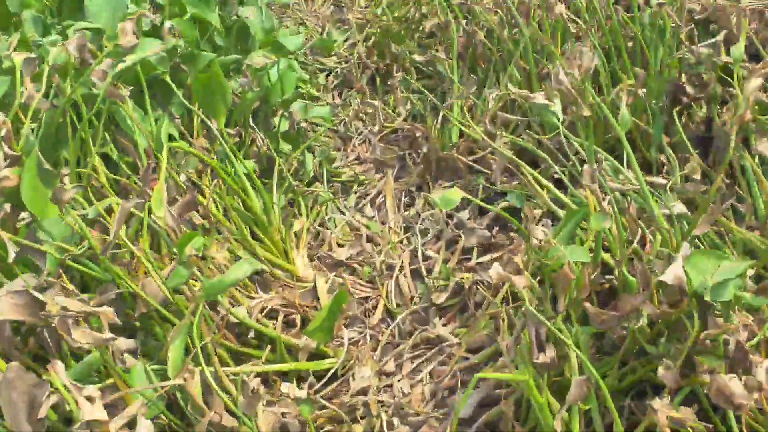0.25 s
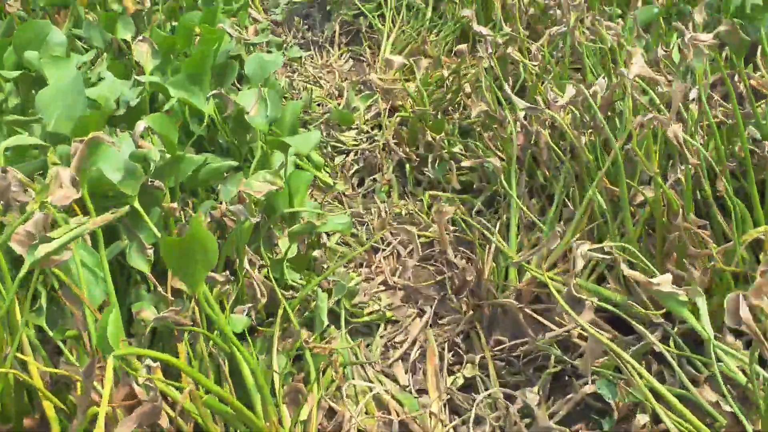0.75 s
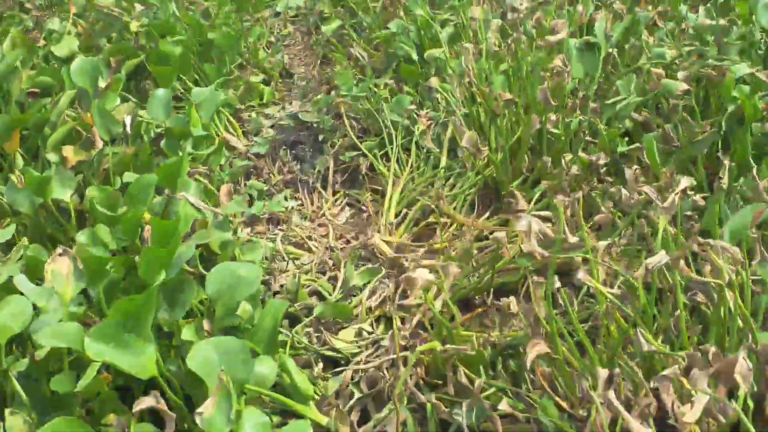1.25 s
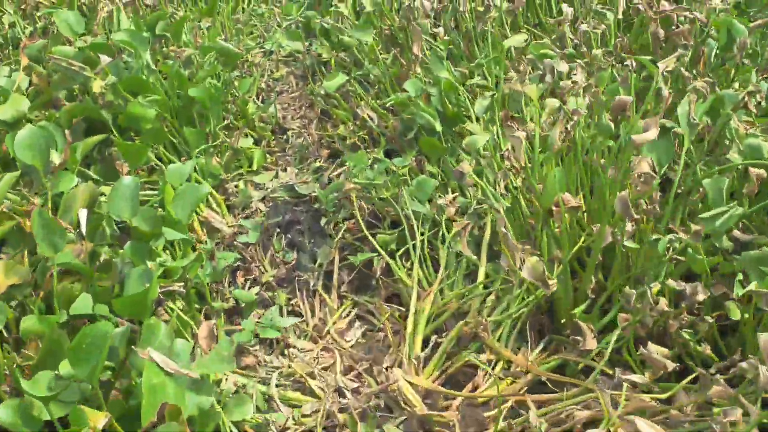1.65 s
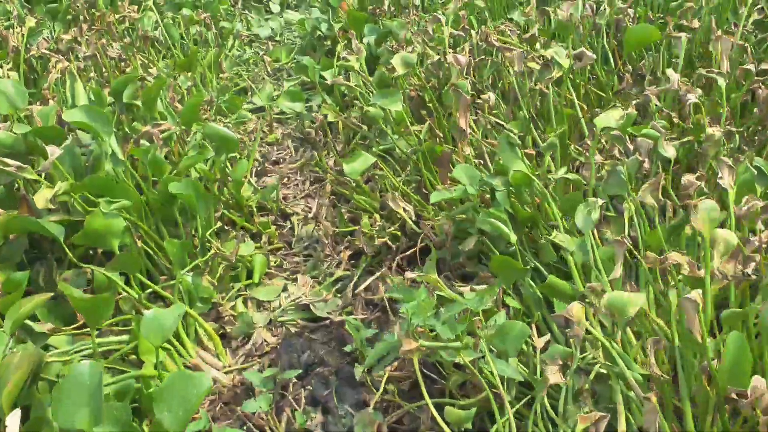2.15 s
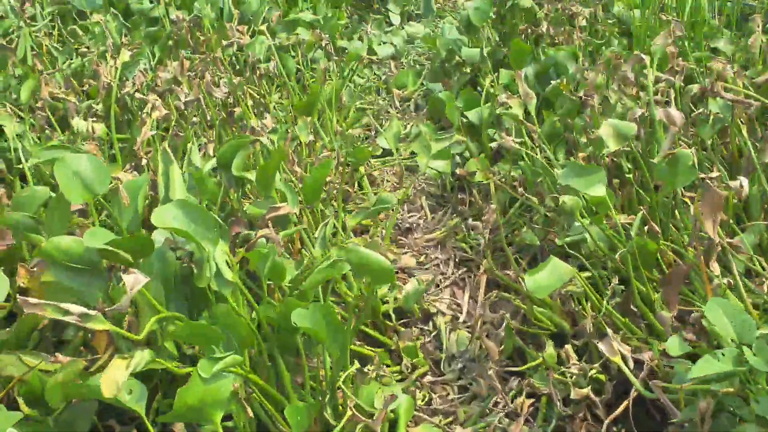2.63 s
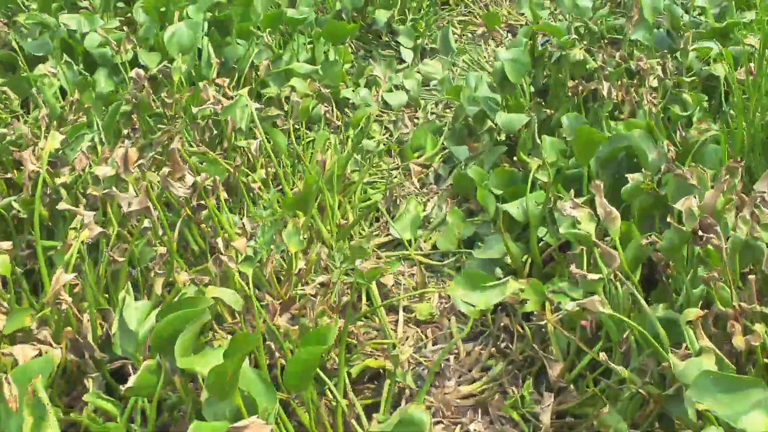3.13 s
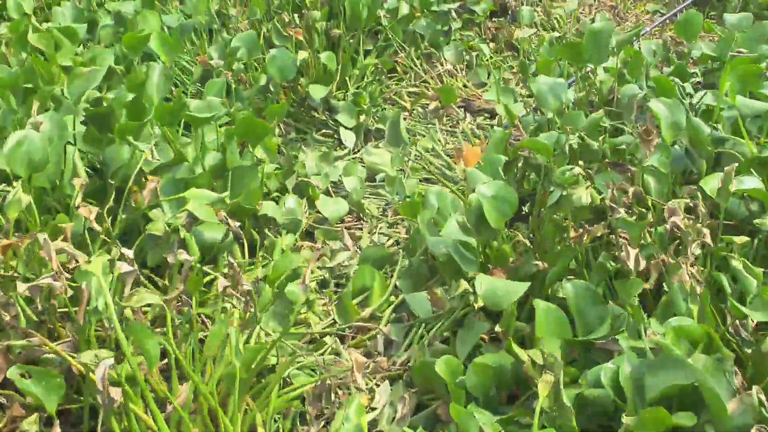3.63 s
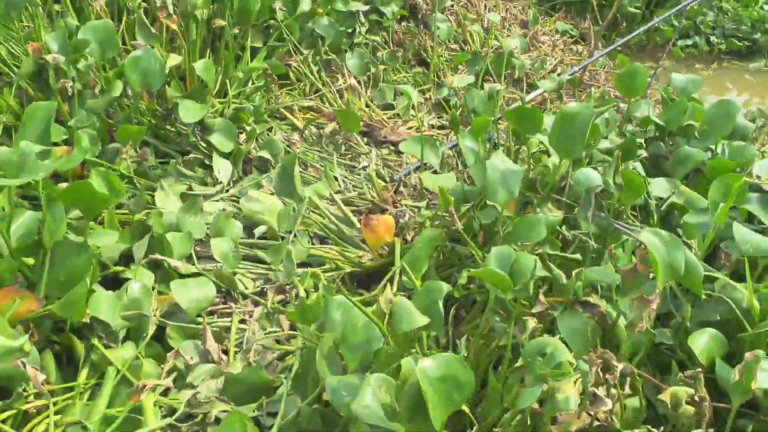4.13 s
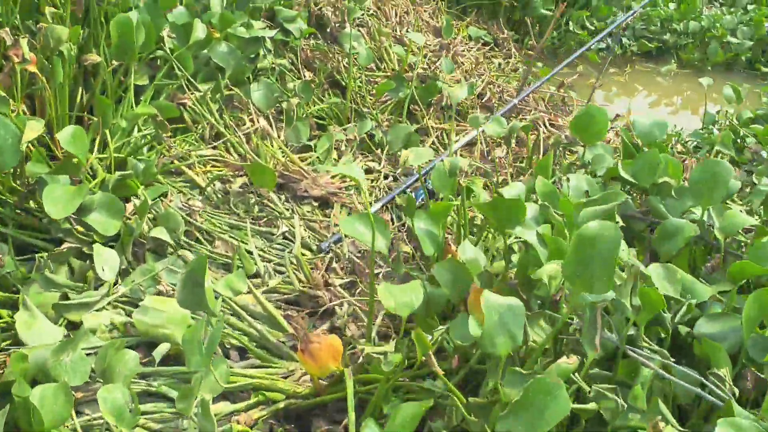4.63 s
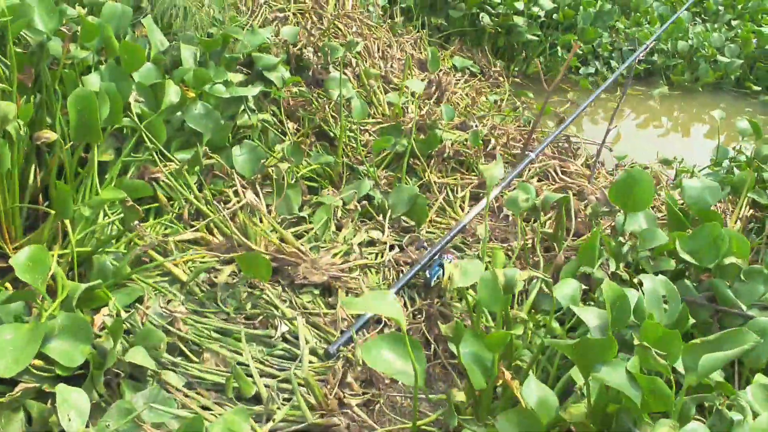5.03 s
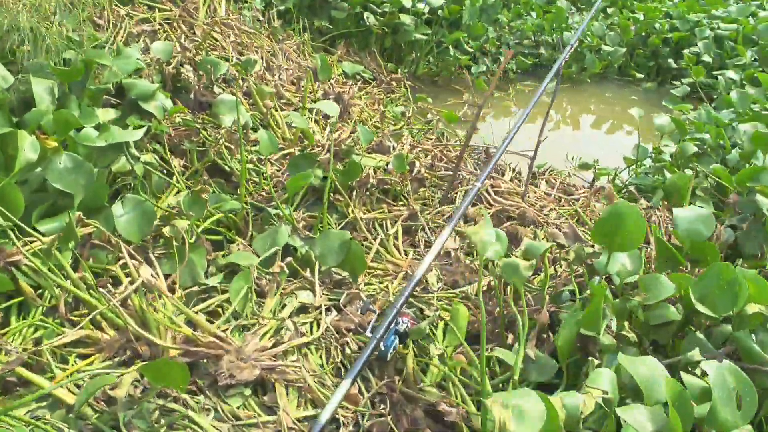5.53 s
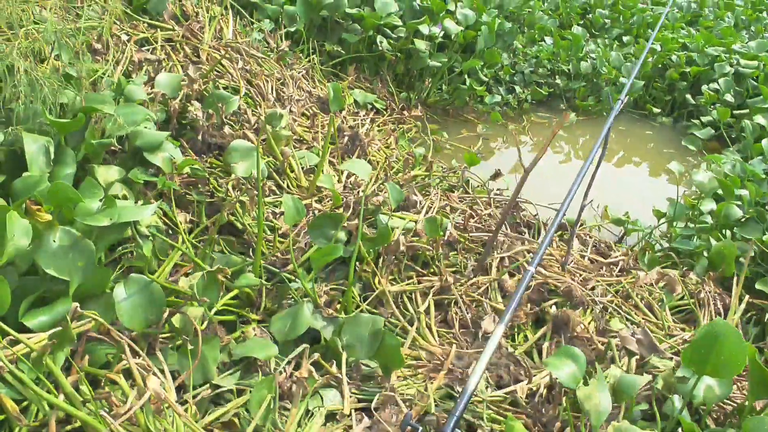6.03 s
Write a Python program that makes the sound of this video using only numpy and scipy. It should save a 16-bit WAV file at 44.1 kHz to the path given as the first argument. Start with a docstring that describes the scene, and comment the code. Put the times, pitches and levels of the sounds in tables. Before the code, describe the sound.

Close, uneven crackling of dry plants underfoot, sharp stem snaps and leaf ticks, over rumbling wind and creaky handling that ends in a hard knock.

```python
"""Footsteps press through dry grass and matted stems, close under a small stereo recorder held in the hand.
Each press shapes a dense scatter of clicks, coloured as stem crunch and leaf hiss; snaps ring at their own pitch.
Wind is shaped noise that buffets each microphone port on its own; jolts of the arm swing both ports alike.
The hand creaks and knocks on the hollow case, ringing its modes; grass further off stirs faintly behind.
"""
import sys
import numpy as np
from scipy import signal
from scipy.fft import rfft, irfft
from scipy.io import wavfile
from scipy.ndimage import uniform_filter1d

SR = 44100
rng = np.random.default_rng(int(sys.argv[2]) if len(sys.argv) > 2 else 0)


def generate_wav(signal):
    """Clip the signal to [-1, 1] and save it as 16-bit WAV at the path in sys.argv[1]."""
    frames = np.transpose(np.atleast_2d(signal))
    scaled = np.clip(frames, -1, 1) * 32767
    pcm = np.round(scaled).astype(np.int16)
    wavfile.write(sys.argv[1], SR, pcm)


N = 276948

# Foot pressing into the grass:
# (time [s], hold [s], stem level [dB], fade [dB/s], papery leaves against stems [dB])
FOOT_PRESSES = [(0.0, 0.058, -39, 250, 1), (0.127, 0.038, -54, 73, -0.4), (0.427, 0.035, -42.5, 250, -2),
                (0.447, 0.14, -39, 400, 0.6), (0.627, 0.019, -47.5, 66, -0.5),
                (0.827, 0.0037, -53.5, 295.5, -4), (1.067, 0.0056, -50.5, 302, -6.5),
                (1.133, 0.1, -52, 200, -2), (1.211, 0.064, -45.5, 109, -2.2), (1.5, 0.032, -64, 36, -5),
                (1.696, 0.087, -53.5, 200, -1), (1.799, 0.078, -43, 85, -3.5), (2.04, 0.015, -53, 302, -8),
                (2.286, 0.12, -46.5, 193, -2.5), (2.419, 0.046, -44, 79, -6.5),
                (2.833, 0.061, -48.5, 100, -0.5), (2.891, 0.04, -48, 196, -7),
                (2.957, 0.026, -45.5, 113, 0.5), (3.412, 0.094, -45.5, 73, -2.5),
                (3.718, 0.015, -55.5, 150, -8), (3.785, 0.15, -60, 80, -7), (3.951, 0.15, -44, 194, 0),
                (4.164, 0.15, -53, 250, -1), (4.455, 0.041, -57.5, 98, 0), (4.562, 0.16, -52.5, 100, -2),
                (4.731, 0.012, -45.5, 77, -5), (4.988, 0.023, -55.5, 150, -6),
                (5.05, 0.0093, -60, 250, -1.5), (5.116, 0.022, -53, 250, 1), (5.181, 0.026, -55, 150, -1),
                (5.289, 0.026, -51, 103, -3), (5.404, 0.027, -47.5, 70, -2), (5.567, 0.11, -54.5, 150, -2),
                (5.751, 0.043, -51.5, 200, -6.5), (5.91, 0.013, -59, 195, 3), (6.031, 0.15, -49.5, 200, -3),
                (6.14, 0.018, -45.5, 113, -1.5)]
# Colour of the crunching stems: (frequency [Hz], relative density [dB])
STEM_COLOUR = [(150, -30.5), (400, -11), (900, -15), (1700, -11.5), (3300, -11.5), (5000, -14),
               (7000, -23.5), (9000, -54)]
# Colour of the hissing dry leaves: (frequency [Hz], relative density [dB])
LEAF_COLOUR = [(5000, -20.5), (7500, -17.5), (9500, -10), (11300, -10.5), (13000, -13.5), (15500, -17)]
# Stems that snap: (time [s], ring level [dB], pitch [Hz], splinter level [dB])
STEM_SNAPS = [(0.085, -44, 3070, -37), (0.432, -48, 2480, -50), (0.4624, -30, 4350, -34),
              (0.672, -51, 4500, -37), (0.848, -51, 4840, -40.5), (0.894, -53, 3840, -46),
              (1.056, -48, 1900, -40), (1.0823, -39, 2040, -44), (1.811, -32.5, 2170, -36),
              (1.828, -41, 1310, -41), (1.8714, -33.5, 1670, -36), (2.036, -46, 1600, -53),
              (2.0535, -43.5, 960, -42), (2.1, -50, 1500, -53), (2.2407, -50, 1700, -47),
              (2.2974, -60, 1280, -43), (2.4405, -29, 3040, -48), (2.453, -32, 2920, -53),
              (2.629, -50, 1040, -44), (2.968, -42, 1440, -41), (2.9806, -46, 1390, -36.5),
              (3.419, -36, 4540, -43), (3.7274, -39, 3970, -49), (3.735, -37.5, 3730, -51),
              (3.956, -43, 1170, -52), (4.5054, -43, 2100, -47), (4.732, -44, 1470, -53),
              (4.745, -28, 1640, -51), (4.89, -40.5, 2270, -40.5), (4.9642, -41, 940, -63),
              (5.0289, -36.5, 1060, -54), (4.993, -44, 1680, -50), (5.063, -51, 5200, -49),
              (5.145, -53, 5000, -44), (5.192, -52, 2370, -44), (5.3027, -42, 4140, -45),
              (5.7583, -50, 1030, -42), (6.0687, -49, 1310, -44), (6.162, -35, 1370, -37)]
# Colour of the splinter spray: (frequency [Hz], relative density [dB])
SPLINTER_COLOUR = [(400, -27), (1000, -35), (4000, 12), (7300, 1), (10500, 11), (15500, -3)]
# Dry leaves that crack with a single sharp tick: (time [s], level [dB])
LEAF_TICKS = [(0.1684, -37.5), (0.199, -49), (0.2104, -40), (0.252, -50), (0.603, -30), (0.754, -44),
              (0.8473, -42), (0.872, -47), (0.918, -52), (1.0329, -38.5), (1.2356, -33), (1.247, -32),
              (1.5379, -42), (1.636, -44), (2.1688, -45), (2.2037, -41), (2.35, -39), (2.371, -40),
              (2.4414, -31), (2.453, -39), (2.7003, -48), (3.3423, -48), (3.3992, -41), (3.7165, -51),
              (3.836, -49), (3.851, -52), (3.9165, -54), (4.6448, -38), (4.7581, -37.5), (4.8885, -41.5),
              (5.1302, -40), (5.4156, -50), (5.476, -40), (5.5258, -44), (5.8008, -37.5)]
# Wind on the two ports: (time [s], left level [dB], right level [dB])
WIND_LEVELS = [(0.0, -32.5, -42.5), (0.25, -31, -26.5), (0.45, -35.5, -39.5), (0.8, -34, -36.5),
               (1.15, -50, -41.5), (1.3, -42, -32), (1.55, -30, -37.5), (1.65, -43, -39), (1.8, -35.5, -37),
               (2.15, -48.5, -43), (2.4, -38, -43.5), (2.58, -40, -32.5), (2.72, -64, -47),
               (3.05, -43, -36.5), (3.33, -34.5, -33.5), (3.65, -35, -41), (3.8, -44.5, -38),
               (4.05, -40, -38.5), (4.4, -43.5, -47), (4.55, -41, -46), (5.1, -42, -46), (5.5, -40.5, -38),
               (5.82, -40, -42), (5.97, -43, -50), (6.2, -37, -36), (6.28, -28, -38)]
# One port sheltered for a moment:
# (middle time [s], length [s], depth of the low buffeting [dB], side [-1 left, 1 right])
WIND_LULLS = [(0.72, 0.085, 37, -1), (1.1, 0.17, 17, -1), (2.15, 0.13, 39, -1), (2.299, 0.095, 28, -1),
              (2.42, 0.062, 27, -1), (2.93, 0.25, 25, -1), (3.72, 0.12, 24, -1), (3.92, 0.06, 31, 1),
              (5.09, 0.062, 17, 1), (5.6, 0.14, 11, 1)]
# Colour of the low wind buffeting: (frequency [Hz], relative density [dB])
BUFFET_COLOUR = [(15, -2), (30, -17.5), (45, -6), (65, -2.5), (100, -6), (140, -21), (220, -60)]
# Colour of the rough gust edge: (frequency [Hz], relative density [dB])
EDGE_COLOUR = [(90, -6), (150, 0), (220, -4), (320, -10), (600, -23.5), (1000, -48)]
# Arm jolts and strong puffs reaching both ports: (start time [s], peak level [dB], pitch [Hz])
ARM_JOLTS = [(0.139, -39, 70), (0.258, -15.5, 65.4), (0.532, -19, 62), (0.627, -27.5, 63.7),
             (0.952, -33, 50), (1.535, -28, 71), (1.736, -26.5, 74), (1.787, -27.5, 97),
             (2.786, -33.5, 60.6), (3.178, -28, 82.5), (3.213, -30.5, 80.5), (3.249, -30, 89),
             (3.291, -24, 89), (3.33, -27.5, 75), (3.352, -37, 95), (3.39, -24, 85.4), (3.468, -31, 79),
             (3.574, -23, 61), (4.468, -29.5, 76), (5.47, -34.5, 67)]
# Uneven rubbing of the hand on the case, swelling and easing: (time [s], level [dB])
HAND_RUB = [(0.0, -48), (0.12, -64), (0.2, -60), (0.4, -71), (0.55, -53.5), (1.0, -66), (1.35, -57),
            (1.42, -66), (1.52, -47), (1.65, -69.5), (1.9, -52), (2.2, -67.5), (2.5, -57), (2.78, -66.5),
            (3.15, -55), (3.4, -70.5), (4.0, -62), (4.4, -67), (4.6, -49.5), (4.67, -62), (4.78, -50),
            (5.1, -58.5), (5.6, -47), (5.72, -65.5), (5.77, -40.5), (5.95, -44), (6.0, -51), (6.085, -34),
            (6.14, -45), (6.19, -42), (6.28, -47.5)]
# Knocks on the case: (time [s], knock level [dB], pitch [Hz], thud level [dB])
CASE_KNOCKS = [(0.188, -36.5, 400, -42), (0.74, -38, 495, -41), (1.328, -35.5, 527, -43),
               (1.513, -31.5, 513, -34), (1.527, -43, 596, -39), (2.052, -44.5, 404, -55),
               (2.438, -38, 940, -61), (2.535, -34, 382, -57), (2.626, -41, 513, -63),
               (3.097, -42.5, 560, -47), (3.154, -39.5, 400, -58.5), (3.19, -39.5, 583, -43),
               (3.214, -40.5, 530, -55), (3.263, -45.5, 288, -48), (3.321, -43.5, 318, -50),
               (3.412, -49, 345, -52), (3.75, -46, 450, -54), (3.852, -46.5, 495, -55),
               (4.45, -44.5, 540, -46), (4.567, -39, 595, -44), (4.603, -33, 443, -39),
               (4.622, -37.5, 424, -47), (4.763, -30, 547, -34.5), (4.849, -42, 470, -58),
               (4.891, -37, 520, -46), (4.905, -31, 570, -48), (4.962, -27, 562, -41),
               (5.028, -34.5, 1000, -52), (5.2, -40.5, 560, -47), (5.225, -42, 604, -50),
               (5.29, -38, 480, -41), (5.345, -39.5, 560, -50), (5.475, -35.5, 490, -40),
               (5.644, -32, 548, -48), (5.753, -32, 544, -51), (5.759, -28, 548, -44),
               (5.772, -33, 714, -35), (5.823, -36, 467, -55), (5.911, -33.5, 500, -33.5),
               (5.94, -38, 696, -42), (6.01, -30, 570, -31.5), (6.026, -30, 465, -49),
               (6.067, -40, 576, -39), (6.101, -29.5, 730, -32), (6.12, -33, 560, -45),
               (6.153, -29, 605, -45), (6.161, -22, 447, -23.5), (6.172, -21, 756, -53),
               (6.1852, -15, 605, -28), (6.205, -42, 650, -38)]
# Hollow modes of the case: (frequency [Hz], width [Hz], relative level [dB])
CASE_MODES = [(420, 111, 2), (576, 158, 2.5), (806, 177, -0.5), (1160, 600, -16)]
# Colour of the grass further off: (frequency [Hz], relative density [dB])
FIELD_COLOUR = [(180, -37), (300, 19), (744, -10.5), (1090, 5.5), (4210, 0.5), (7370, -7.5), (8990, 0),
                (11300, -3.5), (15500, -12)]

PRESS_S = 0.017  # time for the grass to give under the foot
DULL_HZ, DULL_SHARE = 2200, 0.4  # the more papery a press, the less woody crunch below this pitch
TICK_S = 0.00093  # time constant of a leaf tick
# most that a stem click, splinter or leaf tick is early at one port and late at the other
PORT_LAG_S = 0.00009
GRASS_PAN_DB, HAND_PAN_DB = 1.5, -3.5  # average left minus right
EDGE_DB = -11.5  # unsheltered gust edge against the buffeting
ROCK_HZ, ROCK_WIDTH_HZ, ROCK_DB = 290, 190, -3.5  # level against the hollow modes
CREAK_DB, CREAK_S = -9.5, 0.0076  # creak after each knock: level against the knock, time constant
FIELD_DB = -61  # middle level of the grass further off
TOP_HZ = 15800  # top of the recorder's passband


def undb(db):
    """Amplitude factor of a level in dB."""
    return 10 ** (np.asarray(db) / 20)


def unit(x):
    """Scale to an RMS of 1 over all channels."""
    return x / np.sqrt(np.mean(x ** 2))


def columns(table):
    """Curve rows joined by straight lines, one value a sample."""
    s, *cols = np.transpose(table)
    return [np.interp(np.arange(N) / SR, s, c) for c in cols]


def sides(db, pan_db):
    """Left and right gains of a level and a left-minus-right difference."""
    return undb(db + np.array([pan_db, -pan_db]) / 2)


def colour(x, points, size=8192):
    """Causal filter with the given spectrum, from the cepstrum of its log gain; RMS becomes 1."""
    hz, db = np.transpose(points)
    f = np.maximum(np.fft.rfftfreq(size, 1 / SR), 1)
    gain_db = np.interp(np.log(f), np.log(hz), db, left=-60, right=-60)
    ceps = irfft(gain_db * np.log(10) / 20)
    # fold the cepstrum forward in time: minimum phase
    ceps[1:size // 2] *= 2
    ceps[size // 2 + 1:] = 0
    impulse = irfft(np.exp(rfft(ceps)))
    return unit(signal.fftconvolve(x, impulse[None], axes=1)[:, :N])


def band(x, hz, width_hz, order):
    """Resonance of a hollow body as a band-pass around its frequency."""
    edges = [hz - width_hz / 2, hz + width_hz / 2]
    return signal.sosfilt(signal.butter(order, edges, "band", fs=SR, output="sos"), x)


def walk(rate):
    """Random levels held 1 / rate s and slewed twice, unrelated left and right; RMS 1."""
    k = int(SR / rate)
    held = np.repeat(rng.standard_normal((2, N // k + 1)), k, axis=1)
    slewed = uniform_filter1d(uniform_filter1d(held, k), k)
    return unit(slewed[:, :N])


def bursts(at_s, gain, fade_s):
    """Envelope that jumps by each gain and dies away."""
    jump = np.zeros(N)
    np.add.at(jump, (np.asarray(at_s) * SR).astype(int), gain)
    return signal.lfilter([1], [1, -np.exp(-1 / (fade_s * SR))], jump)


def crackle(count, spread_db, lag_s):
    """Scattered clicks, a few stronger; each is up to lag_s early at one port and late at the other."""
    when, sign, big, side = rng.random((count, 4)).T
    size = np.sign(sign - .5) * undb(-spread_db * np.log(1 - .998 * big))
    lag = lag_s * SR * (2 * side - 1)
    out = np.zeros((2, N + 200))  # 100 spare samples at each end for the lag
    for ch in range(2):
        at = 100 + when * (N - 1) + (-1) ** ch * lag
        np.add.at(out[ch], at.astype(int), size)
    return out[:, 100:N + 100]


def rings(events, cycles, noisy, rise):
    """A fading ring for each (time s, level dB, Hz, pan dB) row, with a share of noise in it."""
    out = np.zeros((2, N + SR))
    for s, db, hz, pan_db in events:
        turn = np.arange(int(4 * cycles * SR / hz) + 1) * hz / SR  # time in cycles
        shape = (1 - np.exp(-turn / rise)) * np.exp(-turn / cycles)
        wave = np.sin(2 * np.pi * turn) + noisy * rng.standard_normal((2, len(turn)))
        at = int(s * SR)
        out[:, at:at + len(turn)] += sides(db, pan_db)[:, None] * wave * shape / shape.max()
    return out[:, :N]


def presses():
    """Gains of stems and leaves: each press rises, holds and fades; overlapping presses add in power."""
    power, age = np.zeros((2, N + SR)), np.arange(SR) / SR
    for s, hold_s, db, fade_db_s, papery_db in FOOT_PRESSES:
        rise = np.clip(age / PRESS_S, 0, 1) ** 0.31
        shape = rise * undb(db - fade_db_s * np.maximum(age - PRESS_S - hold_s, 0))
        at = int(s * SR)
        power[:, at:at + SR] += (shape * undb([[0], [papery_db]])) ** 2
    return np.sqrt(power[:, :N])


def grass():
    """Stems crunch in the middle, dry leaves hiss on top; both follow the weight of the foot."""
    when, big, pitch, side = rng.random((2500, 4)).T
    when_s = when * (N - 1) / SR
    # clumps give way all at once: a sudden crunch that dies in a moment
    clumps = 0.57 + bursts(when_s[:500], big[:500] ** 2, fade_s=0.0054)
    leaf_clicks = clumps * crackle(count=50000, spread_db=0.5, lag_s=.0004)
    leaves = colour(leaf_clicks, LEAF_COLOUR) * undb(0.85 * walk(26))
    stem_clicks = np.sqrt(clumps) * crackle(count=40000, spread_db=1.3, lag_s=PORT_LAG_S)
    stems = colour(stem_clicks, STEM_COLOUR) * undb(1.42 * walk(25.076)[0])
    # hollow stalks tick, each at a pitch of its own
    stalks = zip(when_s, 24.0 * big ** 2, 700 * 9.0 ** pitch, 14.5 * (side - .5))
    ticks = unit(clumps * rings(stalks, cycles=6.2, noisy=0.052, rise=0.5))
    body = stems + undb(-7.0) * ticks
    woody = signal.sosfilt(signal.butter(1, DULL_HZ, fs=SR, output="sos"), body)
    stem_gain, leaf_gain = presses()
    lean = ((stem_gain + 1e-9) / (leaf_gain + 1e-9)) ** DULL_SHARE
    crunch = body - woody + undb(-1.0) * lean * woody
    crush = stem_gain * crunch + leaf_gain * leaves
    return crush * sides(0, GRASS_PAN_DB + 0.38 * walk(3.77)[0])


def snaps():
    """Each broken stem rings briefly at its own pitch and sheds a spray of splinters; leaves tick once."""
    s, db, hz, splinter_db = np.transpose(STEM_SNAPS)
    pan_db = GRASS_PAN_DB + 6.0 * rng.standard_normal(len(s))
    ring = rings(zip(s, db, hz, pan_db), cycles=3, noisy=.2, rise=.7)
    spray = colour(crackle(count=90000, spread_db=2, lag_s=PORT_LAG_S), SPLINTER_COLOUR)
    splinters = bursts(s, undb(splinter_db), fade_s=0.0052)
    tick_s, tick_db = np.transpose(LEAF_TICKS)
    ticks = bursts(tick_s, undb(tick_db), fade_s=TICK_S)
    return ring + (splinters + ticks) * spray


def wind():
    """Eddies burst on each port apart; the same eddies, coloured higher, give the gusts a rough edge."""
    db, t = np.array(columns(WIND_LEVELS)), np.arange(N) / SR
    shelter_db = np.zeros((2, N))
    for s, length, depth_db, side in WIND_LULLS:
        port = np.array([[side < 0], [side > 0]])
        shelter_db += depth_db * np.exp(-(2 * (t - s) / length) ** 4) * port
    eddies = undb(4.9 * walk(26)) * rng.standard_normal((2, N))
    buffet = colour(eddies, BUFFET_COLOUR) * undb(-shelter_db)
    # shelter takes less from the edge than from the buffeting
    edge = colour(eddies, EDGE_COLOUR) * undb(EDGE_DB - 0.62 * shelter_db)
    return (buffet + edge) * undb(db)


def jolts():
    """The arm swings the recorder out and back: a dip between two swells, alike on both ports."""
    t = np.arange(N) / SR
    out = np.zeros(N)
    for s, db, hz in ARM_JOLTS:
        turn = hz * (t - s) - 1.5  # cycles from the middle of the dip
        out -= undb(db) * np.cos(2 * np.pi * turn) * np.exp(-(turn / 0.72) ** 2)
    return out


def hand():
    """Skin sticks and slips on the case, whose hollow modes ring briefly into both ports."""
    s, knock_db = np.transpose(CASE_KNOCKS)[:2]
    # the grip creaks on after each knock
    creak = bursts(s, undb(knock_db + CREAK_DB), fade_s=CREAK_S)
    grip = undb(columns(HAND_RUB)[0]) + uniform_filter1d(creak, size=50)
    slips = crackle(count=3000, spread_db=3.0, lag_s=0.00023) * undb(3.0 * walk(45)[0])
    ring = sum(undb(db) * band(slips, hz, width_hz, order=3) for hz, width_hz, db in CASE_MODES)
    # the case also rocks, pushing one port while it pulls the other
    rock = unit(band(slips[0], ROCK_HZ, ROCK_WIDTH_HZ, order=2)) * np.array([[-1], [1]])
    rub = (unit(ring) + undb(ROCK_DB) * rock) * grip
    rub = rub * sides(0, HAND_PAN_DB + 0.34 * walk(3.5)[0])
    knock_rows = [(s, db, hz, HAND_PAN_DB) for s, db, hz, _ in CASE_KNOCKS]
    knocks = rings(knock_rows, cycles=1.94, noisy=0, rise=0.26)
    thud_rows = [(s, thud_db, 150., 8.0) for s, _, _, thud_db in CASE_KNOCKS]
    thuds = rings(thud_rows, cycles=0.7, noisy=0, rise=0.49)
    return rub + knocks + thuds


def field():
    """Grass further off stirs faintly and unevenly: many small clicks under a wandering level."""
    stir = crackle(count=70000, spread_db=4.5, lag_s=.001)
    return colour(stir, FIELD_COLOUR) * undb(FIELD_DB + 3.1 * walk(14)[0])


def scene():
    """Footsteps close below, wind and handling at the recorder, the field behind."""
    return grass() + snaps() + wind() + jolts() + hand() + field()


def record(dry):
    """The recorder cuts the top steeply: a tenth-order elliptic low-pass."""
    return signal.sosfilt(signal.ellip(10, .2, 60, TOP_HZ, fs=SR, output="sos"), dry)


dry = scene()
out = record(dry)
generate_wav(out)
```